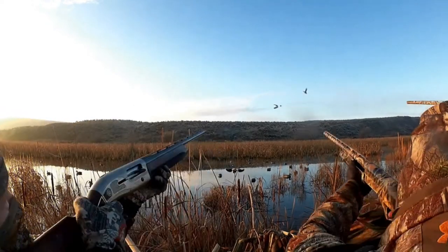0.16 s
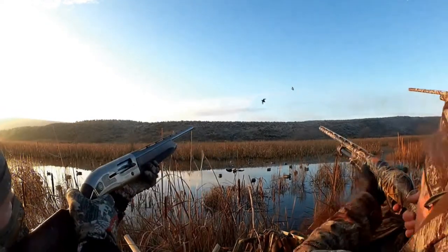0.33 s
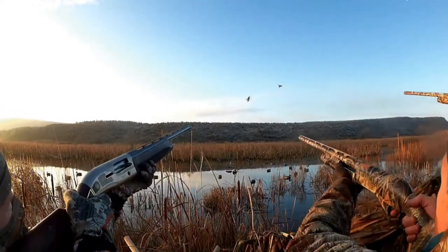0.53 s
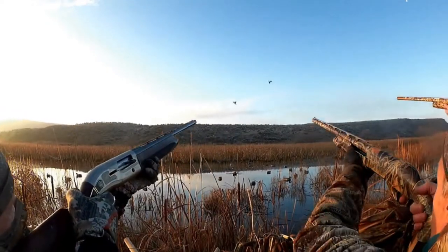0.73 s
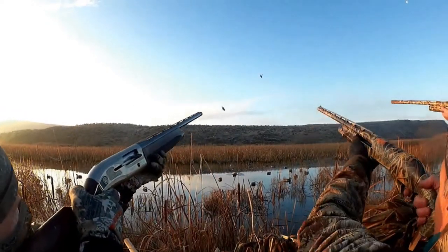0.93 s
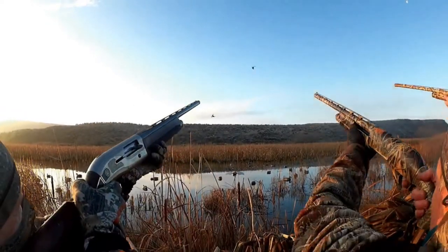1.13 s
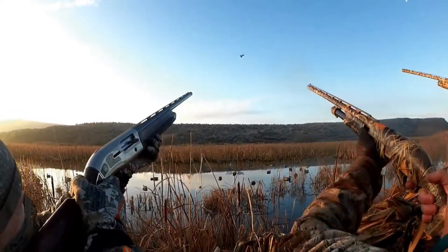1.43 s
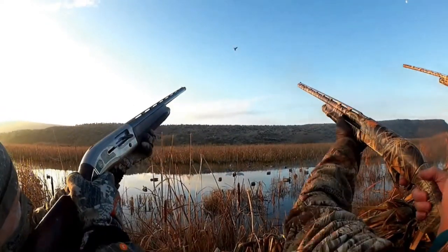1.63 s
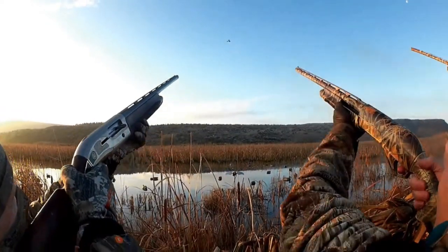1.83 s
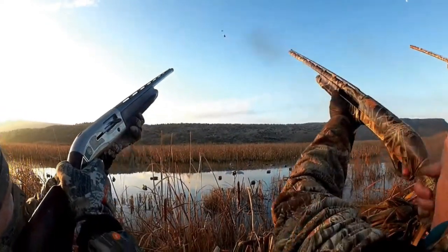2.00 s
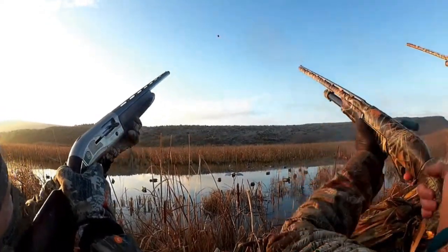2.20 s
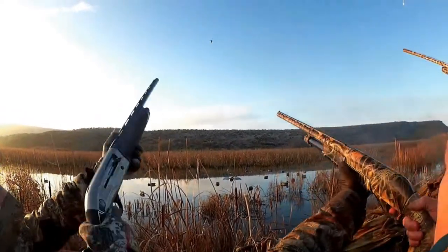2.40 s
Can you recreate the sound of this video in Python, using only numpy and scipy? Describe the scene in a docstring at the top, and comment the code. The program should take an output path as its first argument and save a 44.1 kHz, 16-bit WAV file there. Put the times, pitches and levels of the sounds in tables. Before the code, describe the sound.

From a marsh blind, shotguns fire a tight three-shot burst, then a single blast, a quick pair and a last shot. Metallic clacks follow, hills answer with dull rolling echoes, and the close microphone clips hard.

```python
"""Shotguns at the marsh edge

Shotguns fire seven shots from a blind at the edge of an open marsh, close to a stereo microphone.
Each shot is a crack of held noise and a low thump of dying modes, which overload the input.
Struck, ringing steel gives the clacks of the action. Noise bands that rise and die give the echo from
the near bank and the dull roll with slaps from the far hills. Air that swells and sinks, and two faint
rustles of reeds, are noise bands that change in loudness."""
import sys
import numpy as np
from scipy import signal
from scipy.fft import rfft, irfft, next_fast_len
from scipy.io import wavfile

SR = 44100
rng = np.random.default_rng(int(sys.argv[2]) if len(sys.argv) > 2 else 0)


def boost(x):
    """Linear amplitude factor 10**(x/20) for a level x in decibels (scalar or array-like)."""
    u = np.asarray(x, float) / 20
    return 10 ** u


def log_audio(samples):
    """Write samples as a 16-bit WAV file to the path given in sys.argv[1]."""
    # one column per channel
    frames = np.atleast_2d(samples).T
    # limit to full scale, then quantise
    limited = np.clip(frames, -1, 1)
    pcm = np.round(limited * 32767).astype(np.int16)
    wavfile.write(sys.argv[1], SR, pcm)


N = 112454  # samples in the scene

# The shots: t/s, crack level/dB, crack hold/s, thump level/dB, thump delay/s, scatter level/dB,
# echo level/dB, slap level/dB, left over right/dB
SHOTS = [(0.222, 8, .0105, 5.5, 0.01016, -4, -17, 2.5, -0.5),
         (.2547, -2.5, 0.0033, 9, 0.0005, -11, -17, -5, 2),
         (.2772, -3, 0.0067, 4, 0.0038, -10, -19.5, -1.5, -2),
         (1.2217, 9, .0105, 9.5, 0.01042, -6, -13.5, -14, 1),
         (1.6401, -3.5, .004, 16, .0002, -6, -21.5, -5, 2),
         (1.7539, 0, 0.0085, 7.5, .004, -10, -16.5, -4.5, 1),
         (2.0474, 11.5, 0.0093, 5, 0.0116, -10, -17.5, -12, 2.5)]
# Centres of the noise bands: f/Hz
BAND_HZ = [60, 130, 250, 450, 800, 1400, 2500, 4000, 6500, 10000, 15000]
# Crack spectrum: f/Hz, level per band/dB
CRACK = [(60, -20), (250, -8.5), (1000, -6.5), (2500, -2), (4000, -1.5), (6500, -4.5), (10000, -7),
         (15000, -8.5)]
# Scatter from blind and reeds: f/Hz, level per band/dB, t60/s
SCATTER = [(60, -14.5, 0.36), (200, -1.5, 0.16), (500, -12.5, 0.3), (1400, -5.5, 0.3), (4020, -1.5, 0.27),
           (9000, 5.5, 0.073), (15000, -12, 0.17)]
# Booming modes of blind and camera mount, before detune: f/Hz, level/dB, t60/s
THUMP_MODES = [(44.9, -12, 0.049), (75, -15, 0.03), (122, -14.5, 0.11), (166.4, 2, 0.054), (204, -1, 0.057),
               (284.2, 4.5, 0.043), (388, -1.5, 0.041), (650, 3.5, 0.022)]
# Echo of the near bank: f/Hz, level per band/dB, t60/s
BANK = [(60, -48.5, 0.49), (203, -35, 0.54), (540, -10, 2.84), (1400, -5, 0.73), (3970, -4.5, 0.74),
        (9000, -13, 0.23), (15000, -40.5, .4)]
# Roll from the hills: f/Hz, level per band/dB, t60/s
ROLL = [(63.5, -66, 1.5), (137.5, -21.5, 4.4), (250, -13.5, 3.3), (450, -6, 2.44), (845, -28.5, 0.8),
        (1370, -20, 1.4), (2530, -23, 6.4), (3860, -26.5, 2.5), (6420, -58, 1.8), (10300, -59, 1.2)]
# Slopes that answer at once: delay/s, level over the roll/dB, t60/s, tilt/dB per octave
SLAPS = [(0.468, 6, 0.059, -2.5), (0.668, 8, 0.37, -7)]
# Bolts and shells: t/s, level before trim/dB, brightness before trim/dB, rattle-length factor,
# pitch factor of the lower modes, left over right/dB
CLACKS = [(0.3034, -2.5, -14, 1.5, 0.92, 3), (0.3266, -4, -20, 0.74, 0.63, 5.5),
          (.393, -13, -7.5, 1.1, 0.68, 7), (.42, -12, -14.5, 1.1, 1.05, 8),
          (0.524, -24.5, 3, .8, 1.05, 3.5), (.547, -14.5, -10.5, 2.5, 1.05, 4.5),
          (.558, -13, -7, 1.5, 0.97, 4.5), (1.279, -2.5, -11, 0.44, .97, 10),
          (1.2912, -14, -20, 0.39, 1.05, -5), (1.386, -3.5, -5, 1.5, 0.67, 3),
          (1.409, -11, -5, 0.9, 0.75, 2.5), (1.478, -29, 7, 1.6, 1.2, 5.5),
          (1.495, -14.5, -1.5, 1.2, 1.2, 7), (1.531, -24, 7, 1.2, 0.86, -4),
          (1.546, -20.5, -11, 2.4, 0.97, 15), (1.557, -7, -6.5, 0.64, .7, 2),
          (1.564, -6, -9.5, 1.2, 0.595, 8), (1.572, -1.5, -8, 1.3, 0.575, 3),
          (1.691, -0.5, -20.5, 0.7, 0.82, 4.5), (1.8074, -9, -11.5, .8, 0.79, 6),
          (2.078, -7.5, -5.5, 1.8, 1.2, 11.5), (2.1054, -4, -15, 0.8, 1.03, 6.5),
          (2.169, -18, -38, 1.4, 0.33, 6), (2.198, -16.5, -18.5, 0.42, 0.78, -3),
          (2.219, -16, -12, .9, 1, 7.5), (2.246, -18, 1, 2.5, 1.6, 7),
          (2.2581, -4.5, -11, 1.1, 1.042, 11.5)]
# Lower ringing modes of the steel, before pitch factor and detune: f/Hz, level/dB, t60/s
ACTION_LOW = [(838, -21.5, .012), (1920, -2.5, 0.0047), (2666, 6, 0.0057), (3280, -4.5, .009),
              (3930, 1, .008), (5150, 3, 0.0043)]
# Upper ringing modes of the steel, before brightness and detune: f/Hz, level/dB, t60/s
ACTION_HIGH = [(6740, 2, 0.0031), (7600, -4.5, .004), (8620, 2, 0.0044), (9880, 1, 0.0029),
               (11000, -1.5, 0.0017), (13700, -4, 0.0017), (15200, 3, .002)]
# Rustle spectrum: f/Hz, level per band/dB
REEDS = [(250, -20.5), (600, -10), (1500, -5.5), (4000, 5.5), (6500, -4.5), (10000, 3), (15000, -12.5)]
# Rustle loudness over time: t/s, level/dB
REEDS_LEVEL = [(0, -49.5), (.025, -52.5), (.07, -57.5), (.2, -70), (2.3, -75), (2.38, -59), (2.44, -48.5),
               (2.5, -62), (2.55, -60)]
# Open-air spectrum: f/Hz, level per band/dB
AIR = [(60, -20), (130, -7.5), (250, -2.5), (600, -8), (1500, -3), (4000, -13), (6500, -23), (10000, -28.5)]
# Open-air loudness over time: t/s, level/dB
AIR_LEVEL = [(0, -53), (.2, -55.5), (1.05, -38.5), (2.55, -45.5)]
# Stereo likeness of the noise: f/Hz, left-right correlation (0 to 1)
LIKENESS = [(60, 0.97), (140, 1.0), (340, 0.74), (800, 0.99), (1910, 0.34), (4530, 0.1), (9000, 0.21)]
# Stereo lean of the noise: f/Hz, left over right/dB
LEAN = [(60, 0.5), (300, 6.5), (800, 4.5), (2000, 5.5), (4500, 10.5), (9000, -0.5)]
# Microphone in its housing: f/Hz, gain/dB
MIC = [(20, -9), (100, -6.5), (300, 2.5), (1600, 0), (2600, 0), (3800, 7.5), (4600, 2.5), (5300, -8),
       (6300, -11), (7500, -5.5), (8800, -2.5), (10800, -4), (12500, -22.5), (15000, -28.5), (22000, -28)]

DETUNE = 0.029  # scale of the random pitch offsets, as a fraction
RING_RISE_S = 0.00029


def read(points, hz, col=1):
    """Reads a table column at hz, straight lines on a log-frequency axis."""
    p = np.array(points, float)
    return np.interp(np.log(hz + 1), np.log(p[:, 0] + 1), p[:, col])


def level_over_time(points):
    """Gain at every sample from (t/s, level/dB) points."""
    return boost(np.interp(np.arange(N) / SR, *np.transpose(points)))


def add(mix, s, sound):
    """Mixes a two-channel sound in at s seconds."""
    part = mix[:, round(s * SR):][:, :sound.shape[1]]
    part += sound[:, :part.shape[1]]


def sides(db):
    """Left and right gain for a level difference."""
    return boost(np.array([[.5], [-.5]]) * db)


def noise_bands(lump_db):
    """Partly alike left and right noise in overlapping bands of rms 1, then given slow level lumps."""
    lump_s = 0.0063  # time between random level points
    size = next_fast_len(N)
    hz = np.fft.rfftfreq(size, 1 / SR)
    a, b = rfft(rng.standard_normal((2, size)))
    same = np.clip(read(LIKENESS, hz), -1, 1)
    right = same * a + np.sqrt(1 - same ** 2) * b
    stereo = np.array([a, right]) * sides(read(LEAN, hz))

    # cosine crossfades between neighbouring bands
    number = np.arange(len(BAND_HZ))
    place = np.interp(np.log(hz + 1), np.log(BAND_HZ), number)
    distance = np.clip(place - number[:, None], -1, 1)
    cut = np.cos(np.pi / 2 * distance) * (hz > 20)
    bands = irfft(stereo * cut[:, None], size)[..., :N]

    # low and high bands lump separately, the bands between blend the two
    knots = rng.standard_normal((2, 2000))
    t = np.arange(N) / SR
    high, low = [np.interp(t / lump_s, np.arange(2000), k) for k in knots]
    share = np.linspace(0, 1, len(BAND_HZ))[:, None]
    lumps = boost(lump_db * (share * high + (1 - share) * low))[:, None]
    return lumps * bands / bands.std(axis=(1, 2), keepdims=True)


def dying(table, start, db, rise_s, t60=None, tilt_db=0):
    """Power of each band: rises at start, then dies at its own speed or at a shared t60."""
    t = np.maximum(np.arange(N) / SR - start, 0)
    hz = np.array(BAND_HZ)[:, None]
    t60 = read(table, hz, col=2) if t60 is None else t60
    tilt = tilt_db * np.log2(hz / BAND_HZ[2])  # dB per octave
    level = db + read(table, hz) + tilt - 60 * t / t60
    return (1 - np.exp(-t / rise_s)) ** 2 * boost(2 * level)


def ring(modes, detune, rise_s):
    """Sum of struck modes: sines that rise fast and die at their own t60."""
    t = np.arange(0, .2, 1 / SR)
    total = 0
    for (hz, db, t60), d in zip(modes, detune):
        total = total + boost(db - 60 * t / t60) * np.sin(2 * np.pi * hz * (1 + d) * t)
    return (1 - np.exp(-t / rise_s)) * total


def reeds():
    """Swelling air noise over the marsh and two faint rustles of reeds or clothing share one set of bands."""
    hz = np.array(BAND_HZ)
    rustle = level_over_time(REEDS_LEVEL) * boost(read(REEDS, hz))[:, None]
    air = level_over_time(AIR_LEVEL) * boost(read(AIR, hz))[:, None]
    gain = np.hypot(rustle, air)  # their powers add
    return (noise_bands(lump_db=1.3) * gain[:, None]).sum(0) / 2


def echoes():
    """Every shot comes back as dying noise from the bank, then rolls and slaps among the hills."""
    bank_s, bank_rise_s = 0.13, 0.0053
    roll_s, roll_rise_s = 0.18, 0.28
    face_db, face_t60, face_tilt_db = -4.5, .3, 1.27  # the bank's face: brighter, one decay for all bands
    power = 0
    for s, *_, echo_db, slap_db, _ in SHOTS:
        power = power + dying(BANK, s + bank_s, echo_db, bank_rise_s)
        power = power + dying(ROLL, s + roll_s, echo_db, roll_rise_s)
        power = power + dying(BANK, s + bank_s, echo_db + face_db, bank_rise_s, face_t60, face_tilt_db)
        for delay, db, t60, tilt_db in SLAPS:
            power = power + dying(ROLL, s + delay, echo_db + slap_db + db, .002, t60, tilt_db)
    return (noise_bands(lump_db=2.5) * np.sqrt(power)[:, None]).sum(0) / 2


def clacks():
    """Steel parts strike, rattle for a moment and ring very briefly: strike and rattle excite the modes."""
    level_trim_db, high_trim_db = -5, 6.5
    rattle_t60, strike = 0.021, 2.1  # s before the length factor; height of the first click
    out, t = np.zeros((2, N)), np.arange(1500) / SR
    draws = rng.standard_normal((len(CLACKS), 13 + 2 * len(t)))
    for (s, db, bright_db, stretch, pitch, pan_db), d in zip(CLACKS, draws):
        low = ring(ACTION_LOW, pitch - 1 + DETUNE * d[:6], RING_RISE_S)
        high = ring(ACTION_HIGH, DETUNE * d[6:13], RING_RISE_S / 4)
        body = low + boost(bright_db + high_trim_db) * high
        rattle = d[13:].reshape(2, -1) * boost(-60 * t / (rattle_t60 * stretch))
        blow = rattle + strike * (t == 0)
        blow = blow + 0.47 * blow[::-1]  # each side leaks into the other
        hit = signal.fftconvolve(blow, body[None], axes=1)
        onset = np.sqrt(2 * (hit[:, :130] ** 2).mean())
        add(out, s, boost(db + level_trim_db) * sides(pan_db) * hit / onset)
    return out


def thumps():
    """The blast wave, a push and a longer pull, sets blind and camera mount booming."""
    push_s = 0.0015
    right_damp_db_per_s = 147  # the boom dies sooner at the right microphone
    out, u = np.zeros((2, N)), np.arange(0, .02, 1 / SR) / push_s
    blast = (1 - u) * np.exp(-u)
    offsets = rng.uniform(-DETUNE, DETUNE, (len(SHOTS), 2, len(THUMP_MODES)))
    for (s, _, _, thump_db, delay, *_), d in zip(SHOTS, offsets):
        detunes = (d[0], d[0] + d[1])  # left, right
        boom = np.array([np.convolve(blast, ring(THUMP_MODES, side, RING_RISE_S)) for side in detunes])
        damp = boost(-np.outer([0, right_damp_db_per_s], np.arange(boom.shape[1]) / SR))
        add(out, s + delay, boost(thump_db) * damp * boom / abs(boom).max())
    return out


def cracks():
    """Muzzle gas tears the air: a held burst of noise, then scatter from everything near."""
    lead_s, lead_db, lead_db_per_s = 0.0086, -22, 3001  # a weak hiss swells ahead of the crack
    crack_t60 = .016
    haze_db, haze_t60 = -17, 0.39  # slower scatter from the reed beds farther out
    t = np.arange(N) / SR
    noise = noise_bands(lump_db=1.4)
    hiss = (noise * boost(read(CRACK, np.array(BAND_HZ)))[:, None, None]).sum(0) / 2
    out, power = 0, 0
    for s, crack_db, hold, _, _, scatter_db, _, _, pan_db in SHOTS:
        lead = np.where(t < s, lead_db + lead_db_per_s * (t - s), 0)
        fall = 60 * np.maximum(t - s - hold, 0) / crack_t60
        burst = (t > s - lead_s) * boost(crack_db + lead - fall)
        out = out + sides(pan_db) * burst * hiss
        near = dying(SCATTER, s, scatter_db, 0.0015)
        haze = dying(SCATTER, s, scatter_db + haze_db, 0.0078, haze_t60)
        power = power + (near + haze)[:, None] * sides(2 * pan_db)
    # the same noise backwards, so scatter does not copy the crack
    scatter = (noise[..., ::-1] * np.sqrt(power)).sum(0) / 2
    return out + scatter


def scene():
    """All sources at the microphones."""
    return reeds() + echoes() + clacks() + thumps() + cracks()


def band_limit(x):
    """A steep low-pass at the top of the band."""
    return signal.sosfilt(signal.butter(12, 16200, fs=SR, output="sos"), x)


def record(dry):
    """The housing colours the sound as a minimum-phase filter, then the input clips hard."""
    clip = 1.01  # full scale is 1
    log_gain = np.log(boost(read(MIC, abs(np.fft.fftfreq(8192, 1 / SR)))))
    minimum_phase = np.exp(np.conj(signal.hilbert(log_gain)))
    taps = np.fft.ifft(minimum_phase).real[:2048]
    wet = signal.oaconvolve(dry, taps[None], axes=1)[:, :N]
    mix = np.clip(wet, -clip, clip)
    return band_limit(mix)


dry = scene()
out = record(dry)
log_audio(out)
```